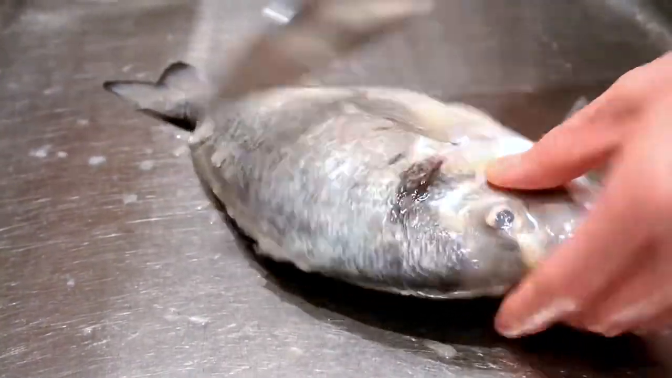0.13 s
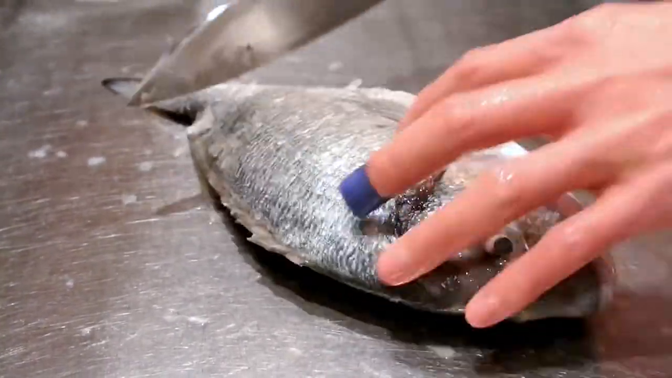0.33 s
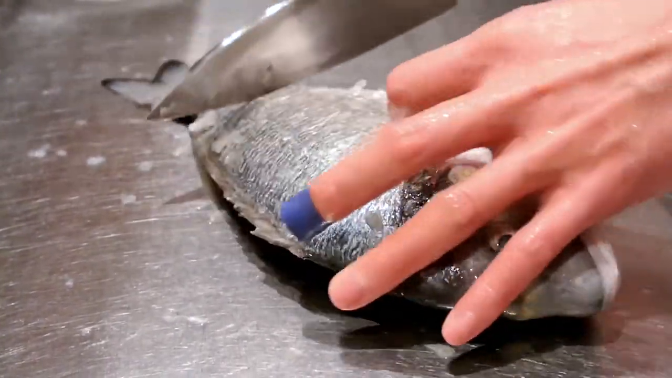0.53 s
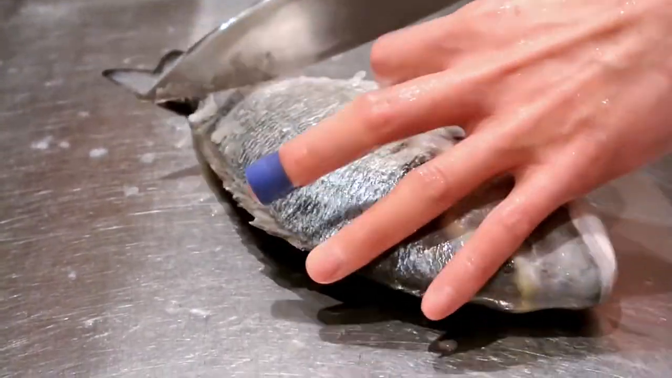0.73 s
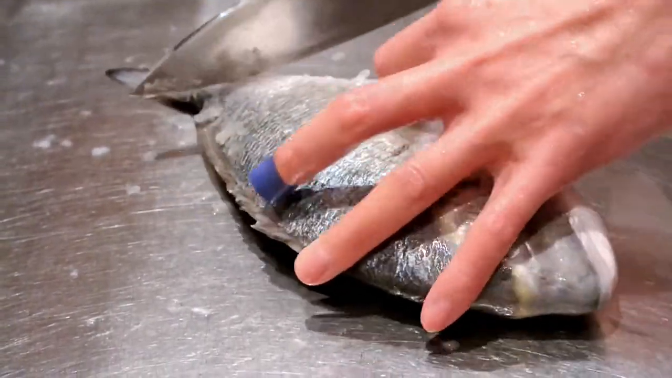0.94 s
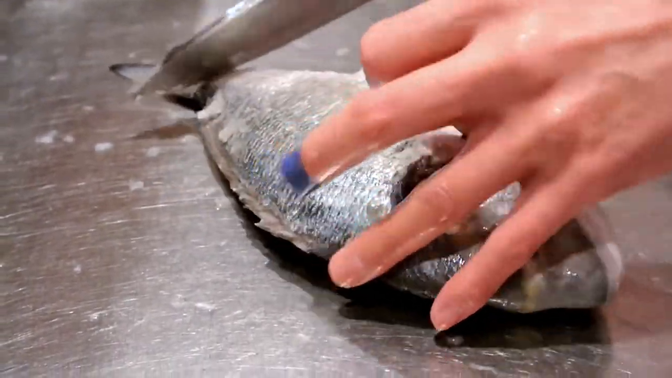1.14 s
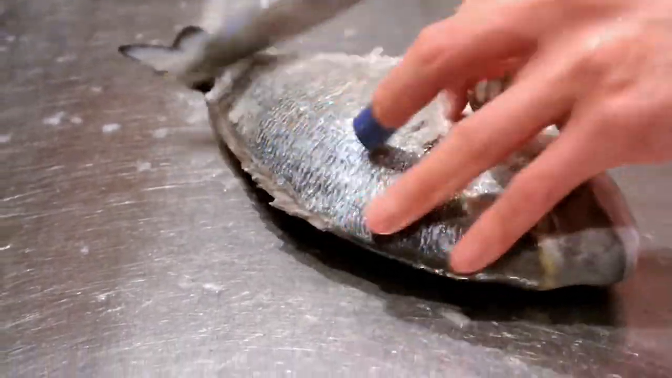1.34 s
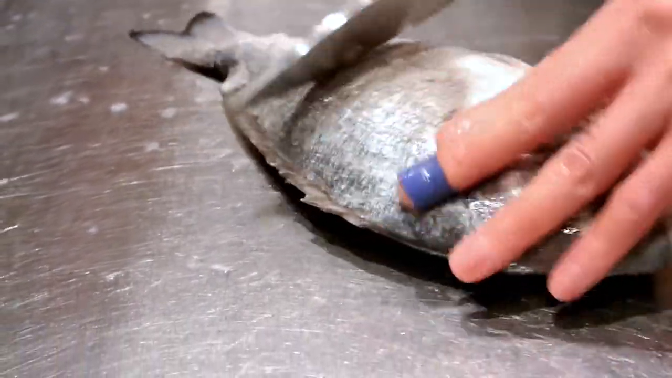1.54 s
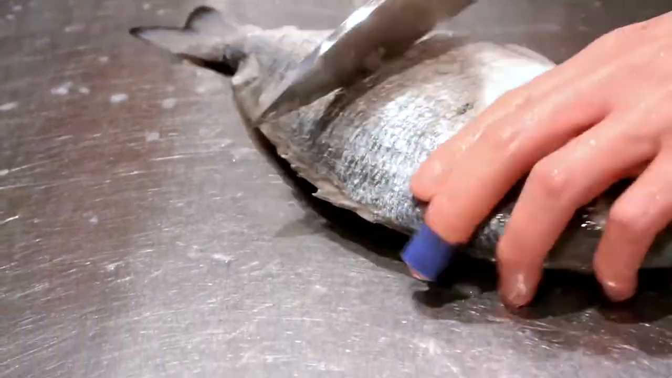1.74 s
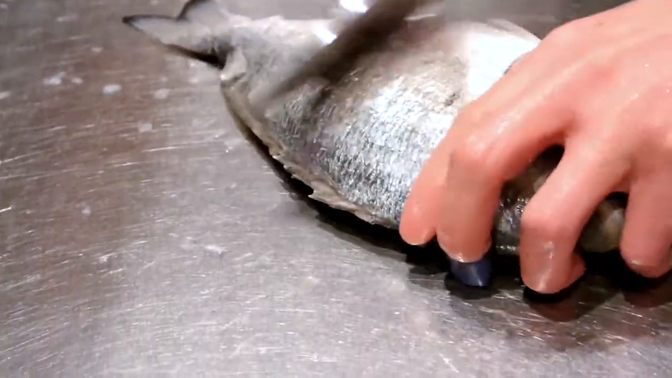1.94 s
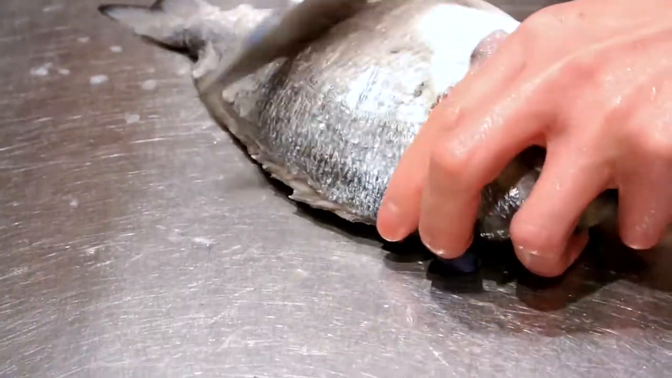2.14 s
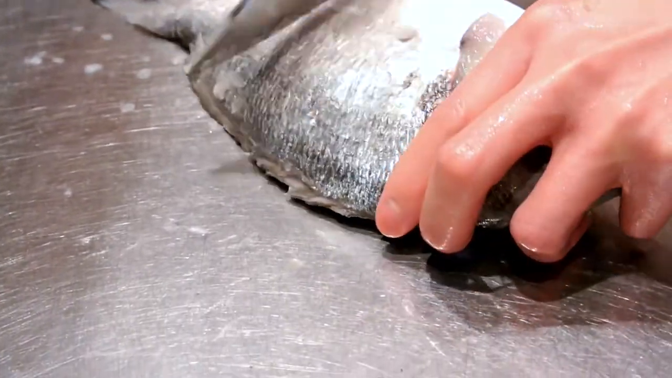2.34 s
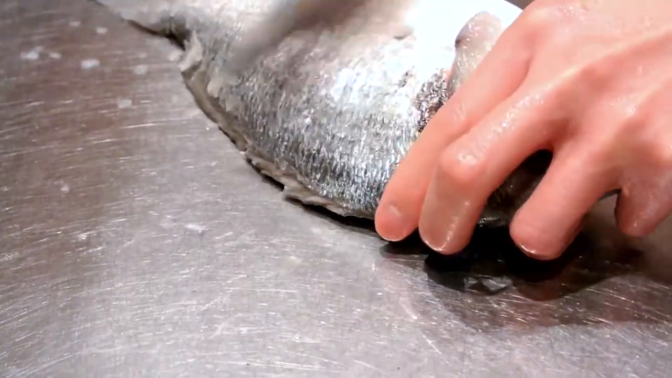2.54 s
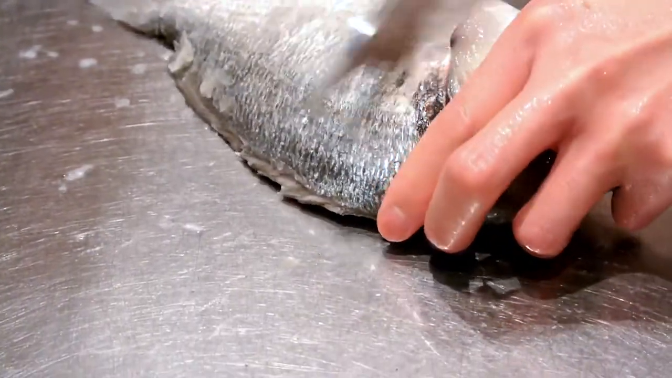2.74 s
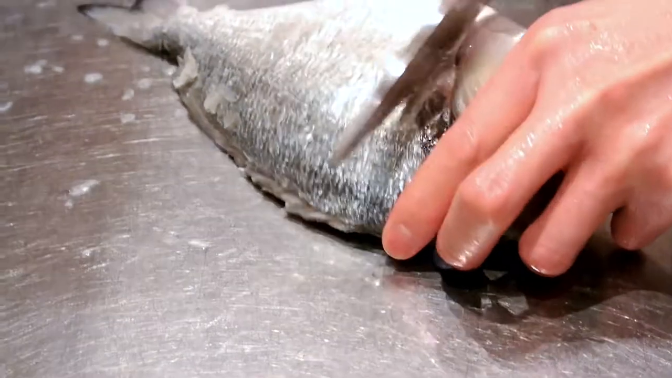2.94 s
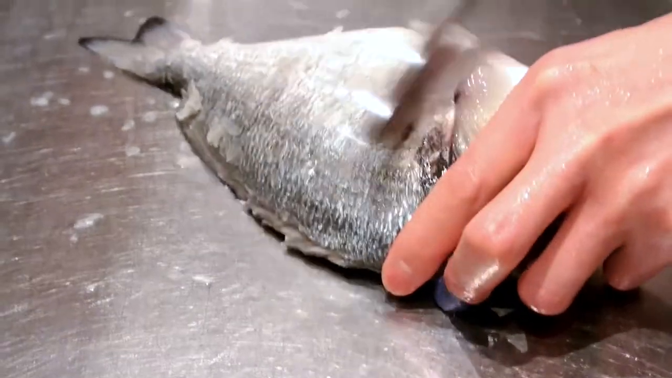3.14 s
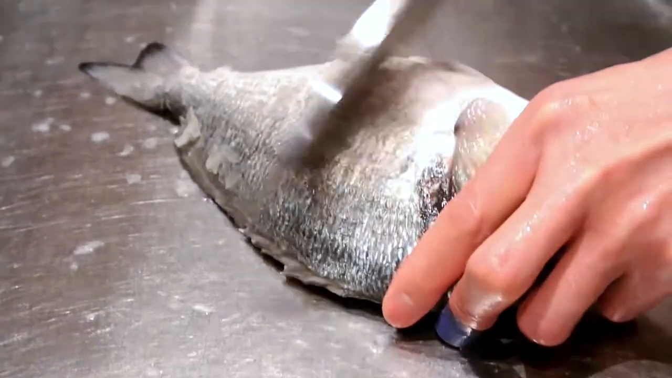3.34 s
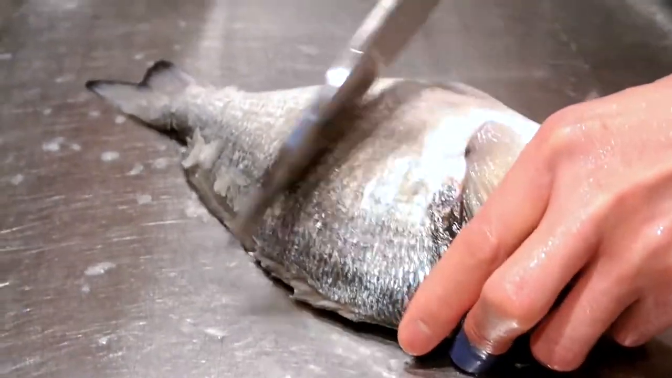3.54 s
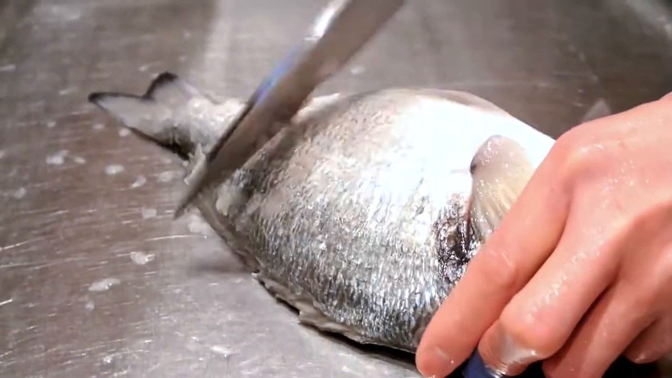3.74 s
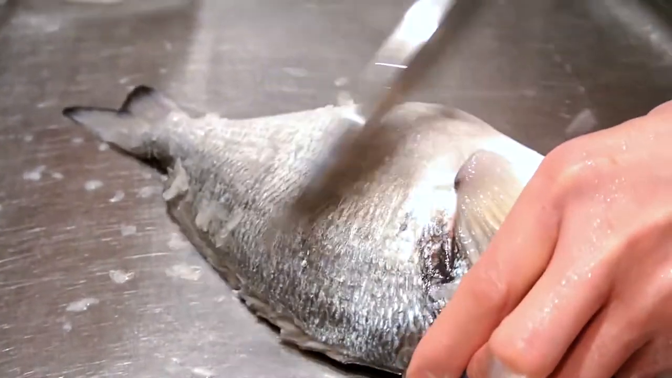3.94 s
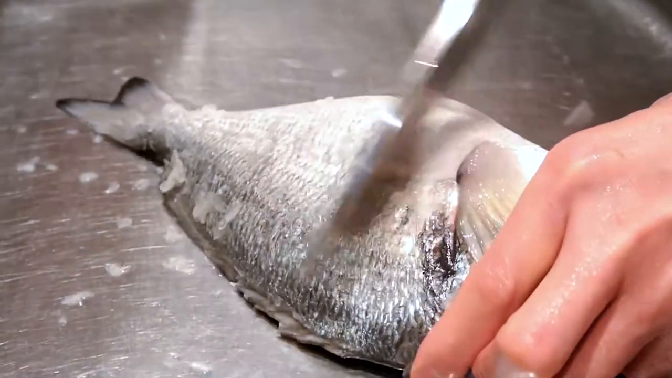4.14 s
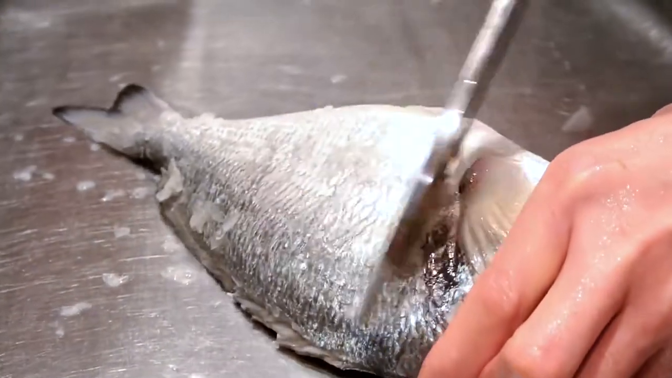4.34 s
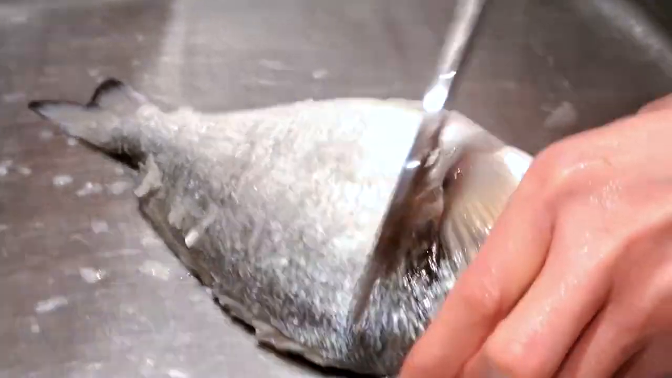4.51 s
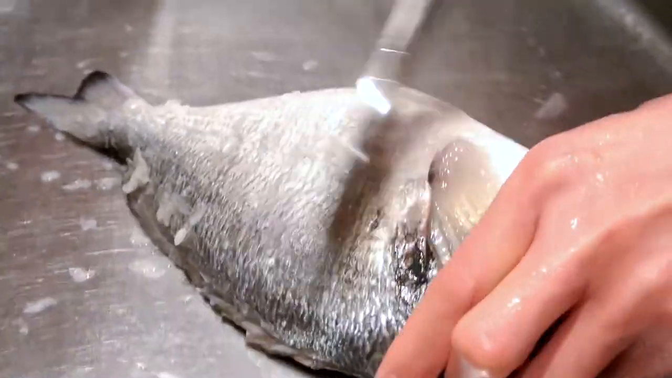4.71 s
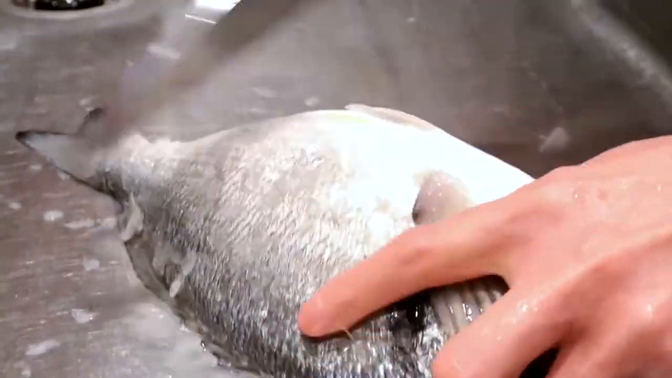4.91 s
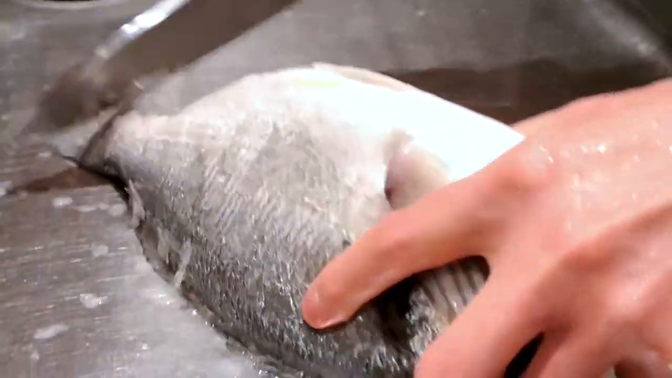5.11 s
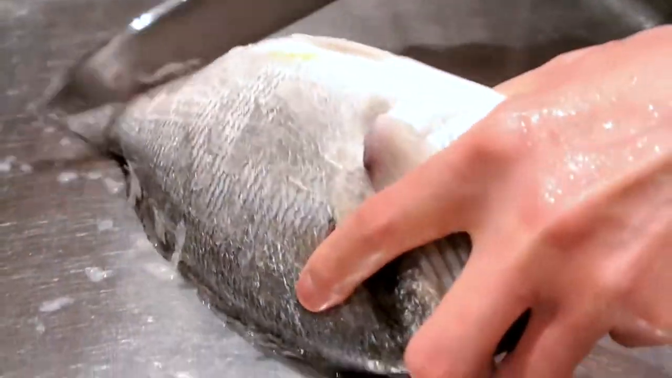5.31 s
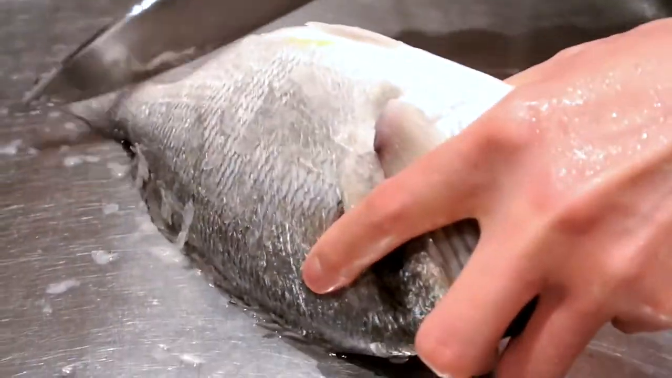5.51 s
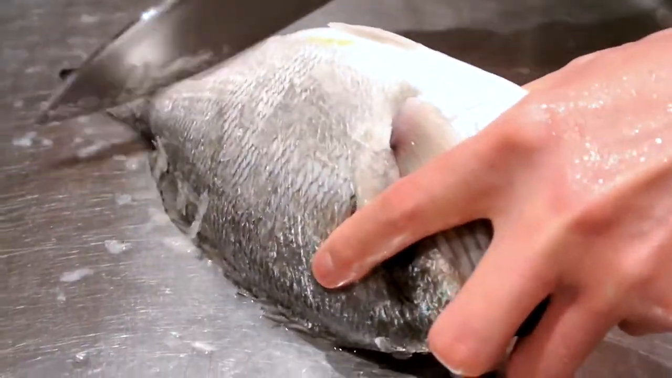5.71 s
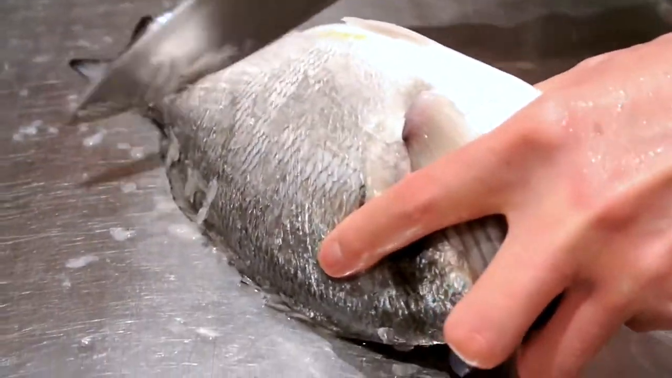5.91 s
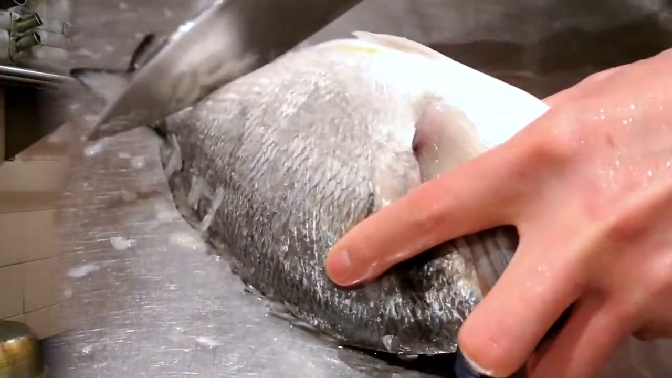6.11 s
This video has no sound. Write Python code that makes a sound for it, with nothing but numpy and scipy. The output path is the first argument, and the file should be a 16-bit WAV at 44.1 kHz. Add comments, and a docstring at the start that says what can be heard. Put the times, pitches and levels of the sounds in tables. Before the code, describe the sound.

Very close to the microphone, a knife edge makes one early crackly scrape on a fish, then only soft touches and slides. After a second it settles into quick, gritty strokes, about four per second, with lighter drags between. Scales snap sharply, the blade rings faintly and the steel counter thuds low. A brief pause comes before the last strokes, over faint kitchen hiss and hum.

```python
"""A fish lies on a steel counter in a kitchen, close to the microphone. Light touches, then one scrape that cracks
at once; from 0.2 to 1.2 s only soft touches, slides and a few faint snaps. From 1.25 s a steel knife scrapes about
four times a second with light returns, stops near 4.9 s, then strokes again from 5.27 s to the end.
Filtered noise and short ticks make the scrape and snaps, resonances ring the blade and drum the counter,
and near reflections follow; behind it all lie shaped hiss and rumble and an unsteady hum."""
import sys
import numpy as np
from scipy import signal
from scipy.fft import rfft, irfft, next_fast_len
from scipy.io import wavfile
from scipy.ndimage import uniform_filter1d, map_coordinates

SR = 44100
rng = np.random.default_rng(int(sys.argv[2]) if len(sys.argv) > 2 else 0)


def wav_record(signal):
    """Record a signal, one row per channel, as 16-bit PCM in the file named by sys.argv[1]."""
    frames = np.transpose(np.atleast_2d(signal))
    bounded = np.clip(frames, -1, 1)
    # unit amplitude maps onto the largest positive 16-bit level
    quanta = np.round(bounded * 32767).astype(np.int16)
    wavfile.write(sys.argv[1], SR, quanta)


def boost(x):
    """Linear amplitude factor 10**(x/20) for a level x in decibels (scalar or array-like)."""
    u = np.asarray(x, float) / 20
    return 10 ** u


N = 271654  # length [samples]


def unit(x):
    """Scale to rms 1."""
    return x / np.sqrt(np.mean(x ** 2) + 1e-20)


def along(points, hz):
    """Read (frequency [Hz], value) points on a log frequency axis."""
    f, v = np.transpose(points)
    return np.interp(np.log(hz + 1), np.log(f + 1), v)


def filtered(x, response):
    """Multiply the spectrum of x by a response that is a function of frequency [Hz]."""
    m = next_fast_len(N + SR // 2)
    spectrum = rfft(x, m) * response(np.fft.rfftfreq(m, 1 / SR))
    return irfft(spectrum, m)[..., :N]


def wobble(rate):
    """A smooth random curve with rate knots a second."""
    knots = rng.standard_normal(int(N * rate / SR) + 4)
    return map_coordinates(knots, [np.arange(N) * rate / SR])


def spread(pair, alike):
    """Mix two unrelated signals to left and right with a given likeness at each frequency."""
    def turn(hz):
        return np.arccos(np.clip(along(alike, hz), -1, 1)) / 2
    mid, side = filtered(pair, lambda hz: np.array([np.cos(turn(hz)), np.sin(turn(hz))]))
    return np.array([mid + side, mid - side])


# Cutting strokes against the scales; scrape levels are relative, before colouring:
# (start [s], length [s], scrape level [dB], swell along the stroke [dB], counter level [dB], counter pitch [Hz])
CUTTING_STROKES = [(0.075, 0.073, -18, -21.5, -46, 240), (1.252, 0.11, -37, 5.5, -38.5, 240),
                   (1.502, 0.093, -37, 15.5, -36, 240), (1.756, 0.079, -27.5, 2, -34, 275),
                   (1.99, 0.085, -26, 2, -33.5, 285), (2.244, 0.065, -21, -3, -34, 256),
                   (2.507, 0.05, -24, 0, -35, 200), (2.717, 0.074, -22, -4, -37, 225),
                   (2.955, 0.049, -22.5, -4, -38.5, 270), (3.184, 0.064, -28.5, 7, -36.5, 212),
                   (3.431, 0.049, -27, 3.5, -34, 237), (3.658, 0.049, -29, 2.5, -35, 240),
                   (3.89, 0.077, -24, 0, -36, 258), (4.13, 0.026, -30, 10.5, -34.5, 242),
                   (4.354, 0.07, -28.5, 1, -33.5, 236), (4.571, 0.051, -27.5, 3.5, -36.5, 250),
                   (4.791, 0.066, -26, -2, -41.5, 242), (5.272, 0.036, -25.5, 2.5, -40, 240),
                   (5.459, 0.028, -28, 6.5, -36, 245), (5.655, 0.04, -24.5, 0, -33, 250),
                   (5.856, 0.057, -23, -3.5, -40, 245), (6.06, 0.047, -22.5, -5, -41.5, 256)]
# Light drags back toward the tail: (start [s], length [s], relative scrape level [dB])
RETURN_DRAGS = [(1.407, 0.03, -44.5), (1.642, 0.037, -35.5), (1.859, 0.082, -35), (2.181, 0.029, -36.5),
                (2.336, 0.058, -37.5), (2.62, 0.072, -43), (2.85, 0.087, -40), (3.056, 0.029, -42),
                (3.304, 0.071, -40), (3.545, .06, -39.5), (3.751, 0.047, -38), (4.007, 0.063, -38.5),
                (4.222, 0.068, -39), (4.462, 0.058, -41.5), (4.675, 0.05, -37.5), (4.894, 0.03, -38.5),
                (5.398, 0.019, -33), (5.568, 0.14, -41.5), (5.764, 0.044, -40), (5.978, 0.018, -40.5)]
# Edge or fingers set down on the fish, sliding off:
# (start [s], length [s], relative scrape level [dB], counter level [dB])
LIGHT_TOUCHES = [(.001, 0.0086, -37.5, -45.5), (.048, 0.026, -31.5, -38.5), (0.193, 0.061, -43.5, -42),
                 (0.545, 0.62, -50, -56.5), (0.878, 0.054, -33, -49.5), (1.101, 0.016, -42, -49),
                 (1.183, 0.052, -41.5, -63), (2.473, 0.026, -27.5, -56), (5.245, 0.026, -30, -64)]
# Scrape treble over body, drifting as the knife works along the fish: (time [s], level [dB])
TREBLE_DRIFT = [(0, -8), (1.3, -7.5), (2.5, -1.5), (3.4, -6.5), (4.2, -1), (5.4, -14), (6.1, -2)]


def stroke_levels():
    """Gains of the dull and bright scrape and of the counter; harder contact sounds brighter."""
    # rise before and fade after a contact [dB per s]; a touch lands fastest, a return slowest
    stroke_bite, return_bite, touch_bite, scrape_fade = 1889, 400, 4000, 426
    drum_rise, drum_fade = 796, 150
    return_swell_db, touch_swell_db = 0, -13.5
    return_drum_db = -8  # counter level relative to the scrape of a return
    treble_growth = 0.26  # treble gained [dB] per dB of pressure above -30 dB
    dig_in_s = 0.0064  # the edge skims first, so the body of the scrape comes late
    drum_lag_s = 0.015  # the fish jolts the counter a moment after the edge bites

    contacts = [(*row[:-1], stroke_bite) for row in CUTTING_STROKES]
    contacts += [(start, length, db, return_swell_db, db + return_drum_db, return_bite)
                 for start, length, db in RETURN_DRAGS]
    contacts += [(start, length, db, touch_swell_db, drum_db, touch_bite)
                 for start, length, db, drum_db in LIGHT_TOUCHES]
    t = np.arange(N) / SR
    power = np.zeros((3, N))
    for start, length, db, swell_db, counter_db, bite in contacts:
        early = np.maximum(start - t, 0)
        late = np.maximum(t - start - length, 0)
        held = db + swell_db * np.clip((t - start) / length, 0, 1)
        sweep = held - bite * early - scrape_fade * late
        drum_early = np.maximum(start + drum_lag_s - t, 0)
        drum = counter_db - drum_rise * drum_early - drum_fade * late
        treble_db = np.interp(start, *np.transpose(TREBLE_DRIFT)) + treble_growth * (held + 30)
        body = np.interp(t - dig_in_s, t, sweep) - treble_db / 2
        levels = np.array([body, sweep + treble_db / 2, drum])
        nearby = (early < .1) & (late < .2)
        power[:, nearby] += boost(levels[:, nearby]) ** 2
    return np.sqrt(power)


# Colour of the scales under the edge: (frequency [Hz], relative level [dB])
SCALE_COLOUR = [(1000, -10), (2000, -3), (4900, 5), (7200, 4.5), (15000, 10)]


def scrape(dull, bright):
    """Steel rubs wet skin in uneven catches; scales tick louder than the rub when the knife presses hard."""
    rub = snags() * boost(0.26 * wobble(300)) * rng.standard_normal((2, N))
    pressure = boost(wobble(45)) * (dull * bright / boost(-50)) ** .2
    ticks = pressure * crackle(count=5000, scatter_db=1.5, turns=0.63)
    edge = filtered(rub + boost(4.0) * ticks, lambda hz: boost(along(SCALE_COLOUR, hz)))
    low = filtered(edge, lambda hz: 1 / (1 + (hz / 6500) ** 2))
    high = edge - low
    return boost(-3.5) * patchy(dull * low + bright * high, depth_db=2)


def snags():
    """The edge snags on a scale and slips free: sudden jumps of friction that die away quickly."""
    per_second, fade_s, size = 300, .001, 1.2  # size is over the even rub, before scaling to rms 1
    hits = (rng.random(N) < per_second / SR) * np.minimum(rng.exponential(size=N), 2)
    return unit(1 + size * signal.lfilter([1], [1, -np.exp(-1 / (fade_s * SR))], hits))


def crackle(count, scatter_db, turns):
    """Scale rims tick under the edge, each at its own pitch and dying within a few turns, few of them loud."""
    start = rng.integers(0, N, (count, 1))
    hz = np.clip(6500 * np.exp(0.93 * rng.standard_normal((count, 1))), 1200, 16000)
    size = boost(scatter_db * np.minimum(rng.exponential(size=(count, 1)), 4))
    lag = np.arange(64)
    cycles = hz * lag / SR
    places = (start + lag).ravel()
    channels = []
    for _ in range(2):  # same ticks, unrelated phases
        phase = 2 * np.pi * (cycles + rng.random((count, 1)))
        tick = size * np.exp(-cycles / turns) * np.sin(phase)
        channels.append(np.bincount(places, tick.ravel(), N + len(lag))[:N])
    return np.array(channels)


def patchy(x, depth_db):
    """The colour changes from one patch of skin to the next: smooth random gains over time and frequency."""
    z = signal.stft(x, nperseg=128)[2]
    field = uniform_filter1d(rng.standard_normal(z.shape[1:]), size=6, axis=0)
    field = uniform_filter1d(field, size=50, axis=1)
    return signal.istft(z * boost(depth_db * unit(field)), nperseg=128)[1][:, :N]


# Scales tearing loose, relative levels before filtering:
# (time [s], bright part level [dB], dull part over bright part [dB])
TORN_SCALES = [(0.0767, -2, -3), (.0954, -8.5, 6), (.205, -19.5, -2), (.3165, -22, 0), (1.3494, -13, -5),
               (1.5646, -16, 1), (1.6137, -2, -5), (1.682, -20, -10), (1.7814, -4, -10), (1.7988, -5, -7),
               (2.187, -20.5, 10), (2.248, -5, -9), (2.2624, -3, 2), (2.295, -5, -3), (2.5103, -6.5, 7.5),
               (2.5304, -12, -11), (2.7584, -7, -3), (2.976, 0, -16), (3.0225, -5.5, -5), (3.1677, -24, -3),
               (3.2691, -7, 3), (3.4551, -5, 12.5), (3.911, -4, -10), (3.9487, -5, 6), (4.1602, -7, -9),
               (4.3793, -0.5, 0), (4.4372, -7.5, -2), (4.562, -14, -20), (4.5984, -6, -14), (4.7954, -6, 0),
               (4.8168, -18, 1), (4.846, 3.5, 0), (5.2794, -10, 8), (5.2957, -2, -1), (5.304, -1, -10),
               (5.321, 2, -1.5), (5.4704, -5.5, -3), (5.4787, -3.5, -1), (5.489, 5, -4), (5.6678, -8, 6),
               (5.8512, -21, -12), (5.867, -9, 3), (6.0526, -5, -5), (6.0592, -17, -11), (6.0734, -3, -7),
               (6.0994, -2.5, -1.5)]


def snaps():
    """Each torn scale: a sharp crack and some milliseconds of noisy rattle, duller or brighter."""
    crack_hz = 9000
    halves = np.zeros((2, 2, N + SR))  # dull and bright, two channels each
    t = np.arange(SR // 30) / SR
    shape = boost(-60 * t / .001) + .4 * boost(-60 * t / .045)
    for start, db, dull_db in TORN_SCALES:
        burst = .5 * shape * rng.standard_normal((2, len(t)))
        burst[0, :6] = 1.4 * np.sin(2 * np.pi * crack_hz * t[:6])  # the opening crack
        levels = boost([[[db + dull_db]], [[db]]])
        halves[:, :, round(start * SR):][..., :len(t)] += burst * levels
    dull, bright = halves[..., :N]

    def low(hz):
        return 1j * hz * 2600 / (2600 ** 2 - hz * hz + 1j * hz * 4000)

    def high(hz):
        return (1j * hz / (3500 + 1j * hz)) ** 2
    return filtered(dull, low) + filtered(bright, high)


# Ringing modes of the blade: (frequency [Hz], width [Hz], relative level [dB])
BLADE_MODES = [(1600, 80, -5), (2620, 100, -1), (3720, 80, 0), (4970, 90, -2), (5880, 70, 1), (7990, 60, 1),
               (10460, 70, -1)]


def blade(force):
    """Contact noise rings each mode, struck or missed as the contact wanders along the edge."""
    ring = 0
    for hz, width, db in BLADE_MODES:
        struck = boost(9 * np.tanh(1.5 * wobble(20) - 1))
        ring = ring + boost(db) * signal.lfilter(*signal.iirpeak(hz, hz / width, SR), struck * force)
    return ring


# Left-right likeness of the close sounds at the microphone: (frequency [Hz], likeness [0-1])
NEAR_LIKENESS = [(40, 0.93), (200, 1), (2000, 0.77), (7000, 0.19), (15000, 0.39)]


def close_up(pair):
    """Close sources reach left and right much alike in the lows and less so in the treble."""
    return spread(pair, NEAR_LIKENESS)


# Fixed modes of the counter under the fish: (frequency [Hz], width [Hz], relative level [dB])
COUNTER_MODES = [(73, 43, -12), (175, 40, -8), (355, 50, -9), (650, 400, -13)]


def modes(table):
    """Causal response of a set of resonances with alternating signs."""
    def response(f):
        return sum((-1) ** k * boost(db) * 1j * f * width / (hz * hz - f * f + 1j * f * width)
                   for k, (hz, width, db) in enumerate(table))
    return response


def counter(gain):
    """The fish jolts the sheet steel in uneven bumps; its main mode shifts with where the fish is pressed."""
    main_width_hz, main_db = 24, 3  # main mode, level over the fixed modes
    bumps = boost(1.5 * wobble(25))
    fixed = unit(filtered(bumps * rng.standard_normal((2, N)), modes(COUNTER_MODES)))
    start, pitch = np.transpose(CUTTING_STROKES)[[0, -1]]
    latest = np.maximum(np.searchsorted(start, np.arange(N) / SR) - 1, 0)
    phase = 2 * np.pi * np.cumsum(pitch[latest]) / SR
    # slow noise on a sine and a cosine makes a resonance whose pitch can move
    pole = np.exp(-np.pi * main_width_hz / SR)
    swing = signal.lfilter([1], [1, -pole], bumps * rng.standard_normal((2, 2, N)))
    main = unit(swing[0] * np.cos(phase) + swing[1] * np.sin(phase))
    return gain * unit(close_up(fixed + boost(main_db) * main))


# Decay of the surroundings: (frequency [Hz], time to fall 60 dB [s])
WALL_DECAY = [(200, 0.22), (12000, 0.096)]


def walls(x):
    """Counter top and walls answer with a noise tail; each frequency dies at its own speed."""
    hz, t, z = signal.stft(rng.standard_normal((2, SR // 4)), SR, nperseg=256)
    decay = boost(-60 * t / along(WALL_DECAY, hz)[:, None])
    tail = signal.istft(z * decay, SR, nperseg=256)[1]
    delayed = np.pad(x, ((0, 0), (90, 0)))  # about 2 ms
    return signal.fftconvolve(delayed, tail / np.linalg.norm(tail[0]), axes=1)[:, :N]


# Colour of the far kitchen noise: (frequency [Hz], relative level [dB])
KITCHEN_COLOUR = [(25, -26), (102, -10.5), (600, -18), (8800, -20), (14000, -22.5), (16000, -22.5)]
# Left-right likeness of that noise at the microphone: (frequency [Hz], likeness [0-1])
FAR_LIKENESS = [(100, 0.94), (500, 0.61), (5000, 0.06)]


def kitchen():
    """Far hiss and rumble are shaped noise; an unsteady mains hum is one sine of wavering level."""
    noise = filtered(rng.standard_normal((2, N)), lambda hz: boost(along(KITCHEN_COLOUR, hz)))
    air = unit(spread(noise, FAR_LIKENESS))
    hum = boost(-58.0 + 2.8 * wobble(18)) * np.sin(2 * np.pi * 100.2 * np.arange(N) / SR)
    return boost(-47.0) * air + hum


def scene():
    """Knife and fish close to the microphone, the kitchen behind."""
    dull, bright, drum = stroke_levels()
    contact = scrape(dull, bright) + snaps()
    # skin pressed hard against the edge damps the blade; light contact lets it ring
    damping = 1 + (dull * bright / boost(-62)) ** .3
    ring = boost(6.5) * blade(contact / damping)
    knife = close_up(contact + ring)
    echo = boost(-12) * walls(knife)
    return knife + echo + counter(drum) + kitchen()


def band_limit(x):
    """A steep low-pass at the top of the band."""
    return signal.sosfilt(signal.butter(12, 16700, fs=SR, output="sos"), x)


def record(dry):
    """Soft overload near full scale, then a steep band limit."""
    top_hz = 15800
    x = dry / (1 + np.abs(dry / .95) ** 6) ** (1 / 6)
    x = filtered(x, lambda hz: 1 / (1 + (hz / top_hz) ** 120))
    return band_limit(x)


dry = scene()
out = record(dry)
wav_record(out)
```